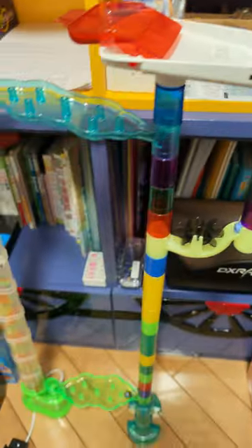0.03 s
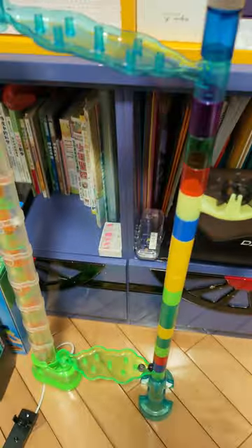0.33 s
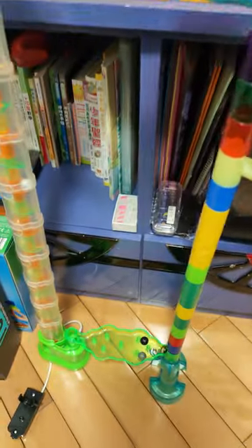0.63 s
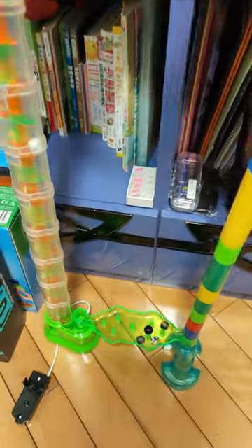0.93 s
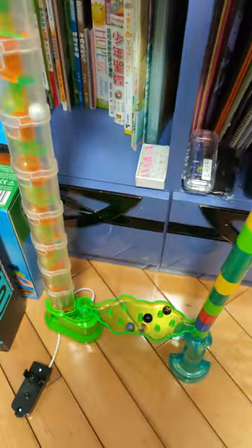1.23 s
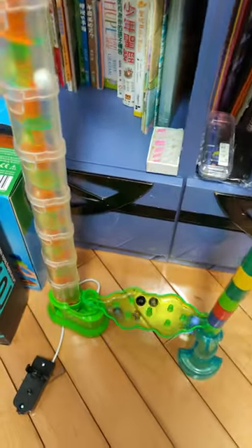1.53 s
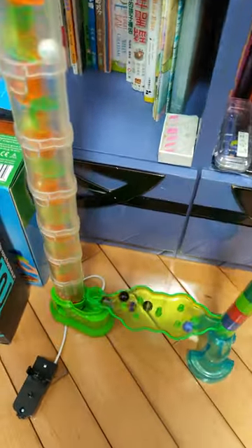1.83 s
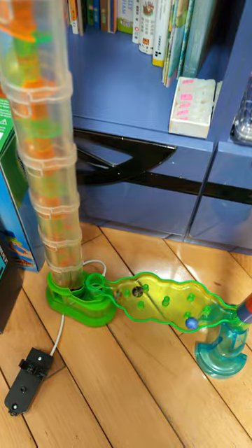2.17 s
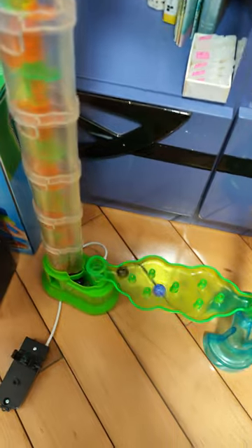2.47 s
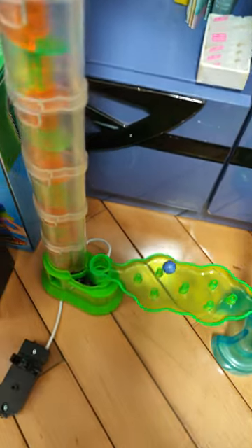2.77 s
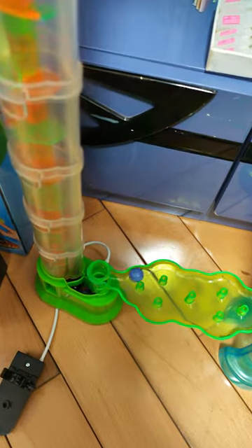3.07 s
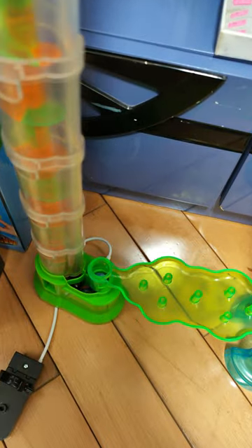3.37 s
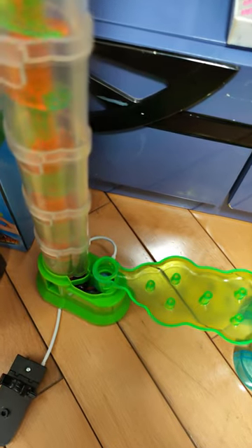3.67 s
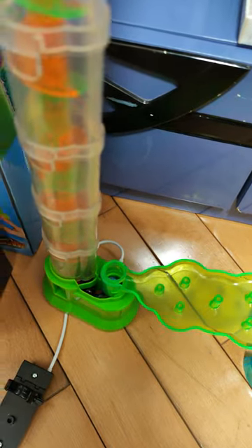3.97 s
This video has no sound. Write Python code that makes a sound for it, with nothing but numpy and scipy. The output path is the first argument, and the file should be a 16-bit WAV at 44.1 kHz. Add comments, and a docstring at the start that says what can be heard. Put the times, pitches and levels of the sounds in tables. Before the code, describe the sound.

Glass marbles clatter down a hollow plastic tower, click together, then roll and clack across a pegged tray. The last drops into a cup. A small toy motor hums faintly throughout, heard close in a small room.

```python
"""Glass marbles clatter down a plastic tower, drop into a pegged tray and bounce across it.
Each contact is a snap and a short crack plus the ring of the plastic; knocks in the tower also
sound the struck piece and the hollow tube. Marbles click together, rolling rumbles the floor, and
the last one drops into a cup. A small room answers. The little geared motor of the marble lift
hums underneath and is left alone at the end."""
import sys
import numpy as np
from scipy import signal
from scipy.fft import rfft, irfft
from scipy.io import wavfile

SR = 44100
rng = np.random.default_rng(int(sys.argv[2]) if len(sys.argv) > 2 else 0)


def wav_out(sig):
    """Save sig, one row per channel (or a flat mono array), as 16-bit PCM at SR to the path in sys.argv[1]."""
    wavfile.write(sys.argv[1], SR, np.round(np.clip(np.atleast_2d(sig).T, -1, 1) * 32767).astype(np.int16))


N = 176400
EDGE_HZ = 16300  # top of the sound's range
TOWER_DB, GLASS_DB, TRAY_DB = 23.5, 18, 24.5  # faders, added to the levels of the hits
BRIGHT_PER_DB, USUAL_KNOCK_DB = 0.76, -15.5  # softer knocks are duller


def amp(db):
    """Decibels to gain."""
    return 10 ** (np.asarray(db) / 20)


def unit(x):
    """Scales to rms 1."""
    return x / np.sqrt(np.mean(x ** 2) + 1e-20)


def read(points, hz):
    """Reads a table on a log-frequency axis."""
    f, value = np.transpose(points)
    return np.interp(np.log(hz + 1), np.log(f), value)


def add(mix, s, sound):
    """Mixes a stereo sound in at s seconds."""
    part = mix[:, max(round(s * SR), 0):][:, :sound.shape[1]]
    part += sound[:, :part.shape[1]]


# stereo width, narrow in the bass: (frequency [Hz], side minus mid [dB])
STEREO_WIDTH = [(100, -9.5), (400, -10), (1100, -0.5), (16000, 1.5)]
def coloured(x, colour, modes=(), treble_db=0, spot_db=0):
    """Shapes a mid and side pair with an EQ curve, resonances and a treble tilt; returns left and right."""
    n = x.shape[1]
    hz = np.fft.rfftfreq(n, 1 / SR)
    shelf = hz ** 3 / (hz ** 3 + 4170 ** 3)  # half way up at 4170 Hz
    knots = np.arange(0, SR, 384)  # each spot struck has its own peaks and dips, 384 Hz wide
    ripple = np.clip(rng.standard_normal(512), -2, 1)[:len(knots)]
    spot = np.interp(hz, knots, ripple) * (.5 + shelf)
    db = read(colour, hz) + treble_db * (shelf - .3) + spot_db * spot
    for f, width, peak_db in modes:
        db = db + peak_db / (1 + (2 * (hz - f) / width) ** 2)
    cepstrum = irfft(np.log(amp(db)), n)
    cepstrum[1:n // 2] *= 2  # minimum phase keeps the attack sharp
    cepstrum[n // 2 + 1:] = 0
    mid, side = rfft(x) * np.exp(rfft(cepstrum))
    side = side * amp(read(STEREO_WIDTH, hz))
    return irfft(np.array([mid + side, mid - side]), n)


# ring of thin plastic: (frequency [Hz], T60 before ring_scale [s])
PLASTIC_DECAY = [(300, 0.094), (1500, 0.078), (5000, 0.062), (15000, 0.027)]
def plastic(ring_scale, count=320, size=6144):
    """The dense dying modes of one moulded part, as sines and cosines."""
    low, high = np.sqrt(120), np.sqrt(EDGE_HZ)
    hz = (low + (high - low) * (np.arange(count) + rng.random(count)) / count) ** 2
    t = np.arange(size) / SR
    decay = np.log(1000) / (ring_scale * read(PLASTIC_DECAY, hz))
    waves = np.exp((2j * np.pi * hz - decay)[:, None] * t) * hz[:, None] ** .25
    return np.vstack([waves.real, waves.imag]).astype(np.float32)


def contact(body, crack_s, ring_db, snap_db=-7.5):
    """Glass touches a hard part: a snap, a brief crack, and the modes excited at a random spot."""
    age = np.arange(body.shape[1]) / SR / crack_s
    crack = unit(age * np.exp(-age) * rng.standard_normal((2, len(age))))
    mode_signs = rng.choice([-1, 1], (2, len(body))).astype(np.float32)
    ring = unit((mode_signs @ body) * (1 - np.exp(-age)))
    impulse = np.arange(len(age)) == np.argmax(age >= 1)  # at the crest of the crack
    snap = unit(np.outer([1, rng.uniform(-1.1, 1)], impulse))
    return amp(snap_db) * snap + crack + amp(ring_db) * ring


def blow(x, db, colour, modes, treble_db):
    """Colours a contact and sets its energy."""
    x = coloured(x, colour, modes, treble_db, spot_db=4)
    return amp(db) * unit(x) / np.sqrt(x.shape[1])


def rattle(curve, per_s, colour, modes, spread_db, count=14):
    """Random small contacts of marbles on plastic, riding a level curve."""
    body, out = plastic(ring_scale=1.0), np.zeros((2, N))
    for _ in range(count):
        onsets = rng.random(N) < per_s / count / SR
        strength = amp(spread_db * np.minimum(rng.exponential(1, N), 3))
        tick = blow(contact(body, crack_s=0.00074, ring_db=1.0), 0, colour, modes, 0)
        out += signal.oaconvolve((onsets * strength)[None], tick, axes=1)[:, :N]
    return unit(out) * amp(np.interp(np.arange(N) / SR, *np.transpose(curve), right=-np.inf))


# reverb time, longest in the bass: (frequency [Hz], T60 [s])
ROOM_DECAY = [(150, 0.76), (700, 0.3), (4000, 0.2), (15000, 0.25)]
def room(x, wet_db=-6, air_hz=11900, build_s=0.0036, size=24000, count=3):
    """Dense reflections of a small room; crossfading tails shift the pattern, as moving marbles would."""
    out = np.zeros((2, N))
    for k in range(count):
        taps = rng.choice([-1., 1.], (2, size)) * (rng.random((2, size)) < 4000 / SR)
        hz, t, spectrum = signal.stft(taps, SR, nperseg=256)
        spectrum = spectrum * amp(-60 * t / read(ROOM_DECAY, hz)[:, None])
        spectrum /= np.hypot(1, (hz / air_hz) ** 2)[:, None]
        tail = signal.istft(spectrum, SR, nperseg=256)[1][:, :size]
        tail *= np.minimum(np.arange(size) / SR / build_s, 1) ** 2
        send = np.cos(np.pi * (3 * np.arange(N) / SR + k / count)) * np.sqrt(2 / count)
        out += signal.oaconvolve(x * send, unit(tail) / np.sqrt(size), axes=1)[:, :N]
    return amp(wet_db) * out


# whine of the gears: (frequency [Hz], level before tone_gain_db [dB])
GEAR_TONES = [(624.5, -67), (780.6, -70), (855.9, -66.5), (1012, -71), (1247, -65), (1340, -68),
              (1481, -64.5), (2186, -67), (2493, -64.5)]
# gear hiss over the rumble of the room: (frequency [Hz], gain [dB])
HISS_EQ = [(30, -10.5), (60, -5), (150, -11.5), (230, -20.5), (700, -22), (2700, -16), (4100, -28),
           (7100, -28.5), (7900, -38), (16000, -41)]
def lift_motor(tone_gain_db=2, hiss_db=-51, shaft_hz=156, waver=.0012):
    """The lift's geared motor: wavering tones, and hiss that pulses with the shaft."""
    t, tones = np.arange(N) / SR, np.zeros((2, N))
    drift_hz = np.geomspace(.5, 14, 20)
    drift = unit(sum(np.sin(2 * np.pi * (f * t + rng.random())) / np.sqrt(f) for f in drift_hz))
    clock = np.cumsum(1 + waver * drift) / SR
    for hz, db in GEAR_TONES:
        phase = rng.random() + np.array([[0], [rng.uniform(-0.34, 0.32)]])
        tones += np.sqrt(2) * amp(db + tone_gain_db) * np.sin(2 * np.pi * (hz * clock + phase))
    hiss = rng.standard_normal((2, N)) * (1 + 0.12 * np.cos(2 * np.pi * shaft_hz * clock))
    return tones + amp(hiss_db) * unit(coloured(hiss, HISS_EQ))


# swell of marbles rolling in the tray: (time [s], level [dB])
ROLL_SWELL = [(1.82, -68), (1.92, -40), (2.02, -48.5), (2.12, -41), (2.35, -30), (2.62, -47.5), (2.9, -65),
              (3.5, -59)]
def floorboards(hz=59, q=6.3, db=-64):
    """Marbles rolling over the tray make the wooden floor under it rumble softly."""
    weight = np.sqrt(amp(np.interp(np.arange(N) / SR, *np.transpose(ROLL_SWELL))))
    rumble = signal.lfilter(*signal.iirpeak(hz, q, SR), weight * rng.standard_normal(N))
    return amp(db) * unit(rumble)


def tray_rolling():
    """Rolling marbles tick quickly and unevenly over the tray."""
    return rattle(ROLL_SWELL, per_s=430, colour=TRAY_EQ, modes=TRAY_RESONANCES, spread_db=5.0)


# chatter of small contacts in the tower: (time [s], level [dB])
RATTLE_SWELL = [(0, -22.5), (.2, -24.5), (.58, -22.5), (.64, -33), (.72, -27.5), (.83, -47), (.93, -38),
                (1.13, -28), (1.3, -35.5), (1.55, -59), (1.7, -32.5), (1.8, -68)]
def tower_rattle():
    """Marbles chatter lightly against the tower on their way down."""
    return rattle(RATTLE_SWELL, per_s=210, colour=TOWER_EQ, modes=TOWER_RESONANCES, spread_db=1.6)


# landing and bounces in the cup: (time [s], level [dB])
CUP_HITS = [(3.458, -16), (3.466, -14.5), (3.479, -22.5), (3.492, -21.5), (3.549, -31)]
# the small cup lacks bass and rings high: (frequency [Hz], width [Hz], gain [dB])
CUP_RESONANCES = [(433, 270, -7.5), (2410, 330, 5), (3420, 220, 7)]
def cup():
    """The last marble drops into the cup at the foot of the lift and settles."""
    out, body = np.zeros((2, N)), plastic(ring_scale=0.49)
    for s, db in CUP_HITS:
        treble_db = BRIGHT_PER_DB * (db - USUAL_KNOCK_DB)
        bounce = contact(body, crack_s=0.0014, ring_db=1.5)
        add(out, s, blow(bounce, TRAY_DB + db, TRAY_EQ, CUP_RESONANCES, treble_db))
    return out


# marble against marble: (time [s], level [dB], treble tilt [dB])
GLASS_HITS = [(.456, -12, 25), (0.635, -25, 11), (0.658, -17.5, 3), (.862, -18, -4), (.870, -18, 6),
              (1.104, -21, -2), (1.213, -18.5, 1), (1.417, -20, -6), (1.501, -15, -9), (1.560, -13.5, -4.5),
              (1.577, -12.5, 5), (1.654, -18.5, 4), (1.662, -14.5, -2), (1.879, -17.5, -2), (1.904, -17, 2),
              (1.939, -20.5, 0.5), (2.038, -26.5, -2), (2.121, -12, -14), (3.118, -21, -2.5),
              (3.528, -14, -1.5)]
# tone of glass on glass: (frequency [Hz], gain [dB])
GLASS_EQ = [(100, -41), (400, -8.5), (700, -5), (1500, 0.5), (3000, -7), (4500, -12), (6700, -1.5),
            (8100, -8.5), (10000, -5), (16000, -23.5)]
def glass():
    """Marbles collide in hard bright clicks that barely ring the track."""
    out, body = np.zeros((2, N)), plastic(ring_scale=0.64)
    for s, db, treble_db in GLASS_HITS:
        click = contact(body, crack_s=0.0011, ring_db=-1.0)
        add(out, s, blow(click, GLASS_DB + db, GLASS_EQ, (), treble_db))
    return out


# hits on the pegs and rim: (time [s], level [dB], treble tilt [dB])
PEG_HITS = [(2.059, -20, -1), (2.066, -20, 0), (2.091, -20, 6), (2.161, -23.5, 1.5), (2.203, -26.5, 5),
            (2.230, -17.5, 0.5), (2.237, -15.5, -0.5), (2.264, -19, 0), (2.278, -22.5, 3), (2.291, -20, -3),
            (2.332, -19, 3.5), (2.371, -20.5, -7), (2.51, -18, 2.5), (2.522, -18.5, -2), (2.555, -22.5, -1),
            (2.573, -18, -2.5), (2.587, -21.5, 9), (2.604, -17, 7.5), (2.611, -22.5, -8), (2.645, -24, -2),
            (2.66, -23.5, 5), (2.800, -18, -6), (2.811, -16, 3.5), (2.824, -22.5, -3), (2.837, -22.5, 2),
            (2.854, -25, -2), (2.881, -30, -2), (2.896, -14, 5.5), (2.952, -22.5, -6), (2.982, -28, -7),
            (3.005, -30.5, -14), (3.291, -26.5, -4.5)]
# tone of the tray, shared by the cup: (frequency [Hz], gain [dB])
TRAY_EQ = [(100, -27), (280, -22.5), (450, -12), (600, -9.5), (900, -5), (1400, -0.5), (2300, -0.5),
           (3300, -4.5), (4700, -12.5), (6800, -7.5), (8100, -20), (9800, -15), (16000, -21.5)]
# strongest resonances of the tray: (frequency [Hz], width [Hz], gain [dB])
TRAY_RESONANCES = [(856, 63, 4.2), (1315, 59, 2.8), (1482, 42, 4.6)]
def tray():
    """Marbles strike the pegs and rim, and the shallow tray clacks hollowly."""
    out, body = np.zeros((2, N)), plastic(ring_scale=0.85)
    for s, db, treble_db in PEG_HITS:
        clack = contact(body, crack_s=0.00083, ring_db=0.5)
        add(out, s, blow(clack, TRAY_DB + db, TRAY_EQ, TRAY_RESONANCES, treble_db))
    return out


def tube_note(s, db, start_hz=798, fall_hz_per_s=95.7, growth_db_per_s=7.5, t60=0.059, size=6144):
    """Three close modes of the hollow tube, lower and stronger as the marbles near its foot."""
    t = np.arange(size) / SR
    hz = (start_hz - fall_hz_per_s * s) * (1 + 0.1274 * rng.uniform(-0.99, 1, (3, 1, 1)))
    modes = np.sin(2 * np.pi * hz * t + rng.standard_normal((3, 2, 1)) / 2).sum(0)
    note = modes * (1 - np.exp(-start_hz * t)) * amp(-60 * t / t60)
    return amp(db + growth_db_per_s * s) * unit(note) / np.sqrt(size)


def piece_note(hz, db, t60=0.052, size=6144):
    """A struck piece of the tower rings with a clear note of its own."""
    t = np.arange(size) / SR
    tone = np.sin(2 * np.pi * (hz * t + rng.random((2, 1)) / 2))
    note = tone * (1 - np.exp(-hz * t / 2)) * amp(-60 * t / t60)
    return amp(db) * unit(note) / np.sqrt(size)


# knocks down the tower: (time [s], level [dB], note of the piece struck [Hz])
TOWER_HITS = [(.039, -11, 3130), (.055, -10.5, 1960), (.114, -14.5, 1950), (.156, -12, 5310),
              (.168, -17.5, 4120), (.231, -13.5, 4370), (.277, -16, 2000), (.313, -16, 2010),
              (.424, -17, 2010), (.455, -16.5, 2830), (.513, -17, 3220), (.531, -16.5, 2720),
              (.554, -14, 2360), (.590, -13, 5550), (.687, -13.5, 5630), (.750, -13.5, 5650),
              (.759, -13, 5680), (.869, -13, 4170), (.984, -14, 6810), (1.052, -16.5, 6840),
              (1.103, -12.5, 4060), (1.170, -14, 1560), (1.240, -13, 5730), (1.349, -12.5, 4060),
              (1.449, -14, 2670), (1.506, -17.5, 2420), (1.596, -24, 1640), (1.802, -36.5, 3470)]
# tone of the tower: (frequency [Hz], gain [dB])
TOWER_EQ = [(100, -26), (250, -17), (450, -12.5), (650, -3.5), (1000, -6), (2000, 1.5), (3200, -1.5),
            (4800, -5.5), (7000, -3), (7900, -14), (10200, -10.5), (16000, -19)]
# resonances of the tower: (frequency [Hz], width [Hz], gain [dB])
TOWER_RESONANCES = [(753, 60, 7), (851, 22, 3), (1790, 380, -0.5)]
def tower(glance_s=0.009, glance_db=-4.5, rebound_s=.007, rebound_db=-6):
    """Each marble glances off the tube wall, knocks and rebounds on one spot; hard knocks glance harder."""
    out, body = np.zeros((2, N)), plastic(ring_scale=0.98)
    for s, db, hz in TOWER_HITS:
        level_db = TOWER_DB + db
        bright_db = BRIGHT_PER_DB * (db - USUAL_KNOCK_DB)
        rebound_at = glance_s + rebound_s * rng.uniform(.8, 1.2)
        touches = np.zeros((2, body.shape[1]))
        for delay, touch_db in [(0, glance_db + bright_db), (glance_s, 0), (rebound_at, rebound_db)]:
            add(touches, delay, amp(touch_db) * contact(body, crack_s=0.0012, ring_db=4))
        add(out, s - glance_s, blow(touches, level_db, TOWER_EQ, TOWER_RESONANCES, bright_db))
        add(out, s, tube_note(s, level_db - 23) + piece_note(hz, level_db - 9.5))
    return out


def scene():
    """The tower stands further off than the tray, so more of it comes by way of the room."""
    far = tower() + tower_rattle()
    near = tray() + cup() + glass() + tray_rolling()
    return far + near + room(far + amp(-2) * near) + lift_motor() + floorboards()


def record(dry):
    """A steep low-pass takes the very top off the mix."""
    lowpass = signal.firwin(511, EDGE_HZ, window=("kaiser", 9), fs=SR)
    return signal.oaconvolve(dry, lowpass[None], "same")


dry = scene()
out = record(dry)
wav_out(out)
```